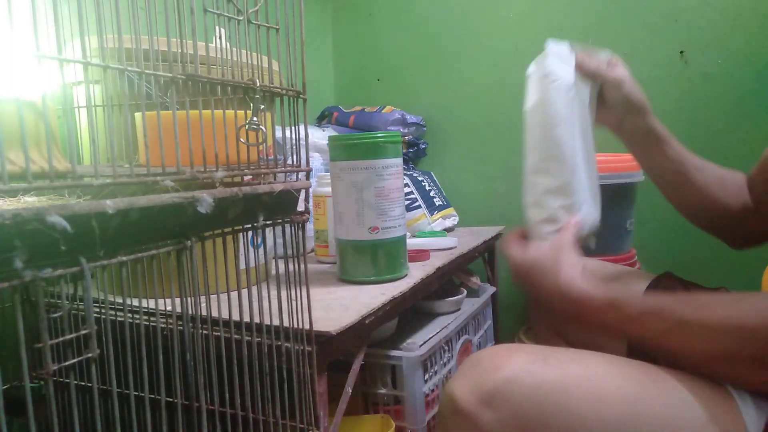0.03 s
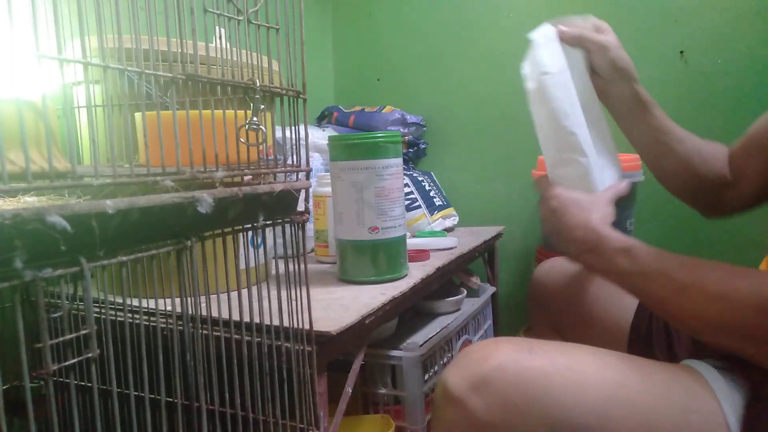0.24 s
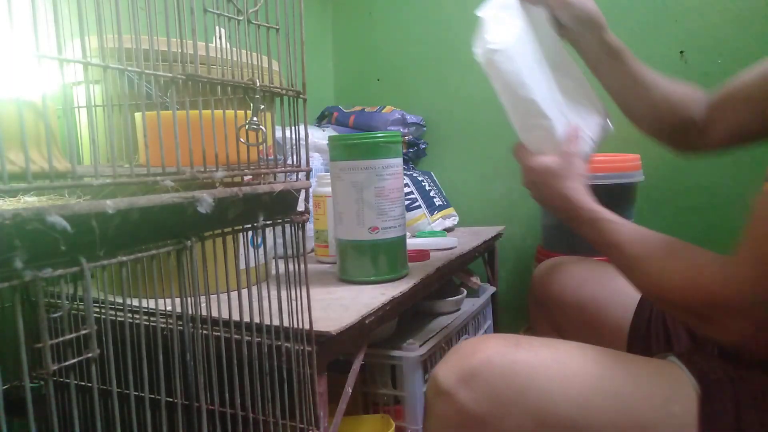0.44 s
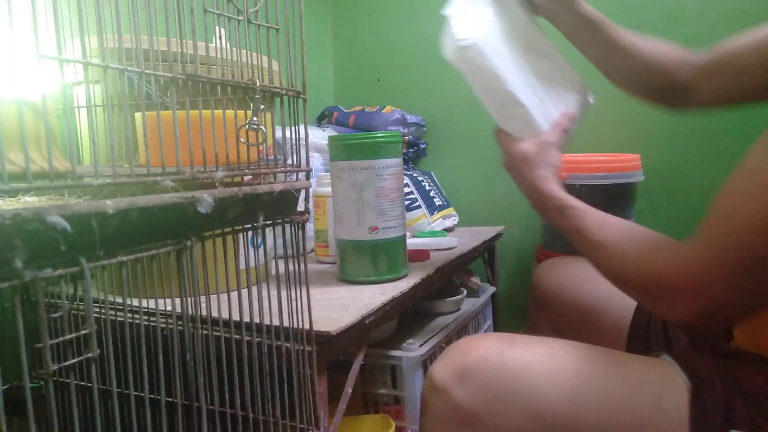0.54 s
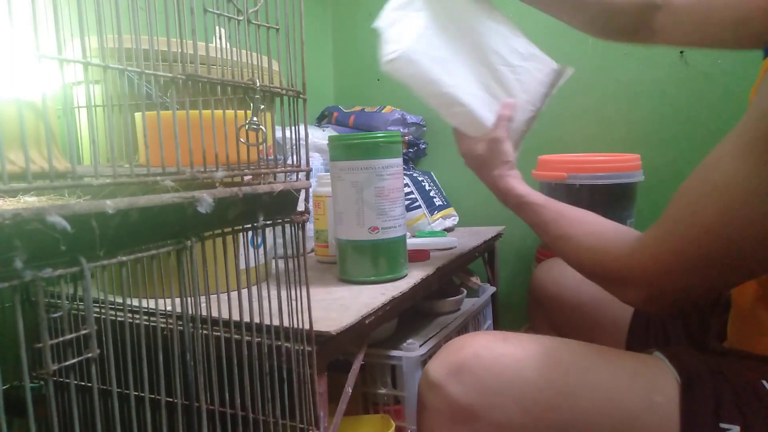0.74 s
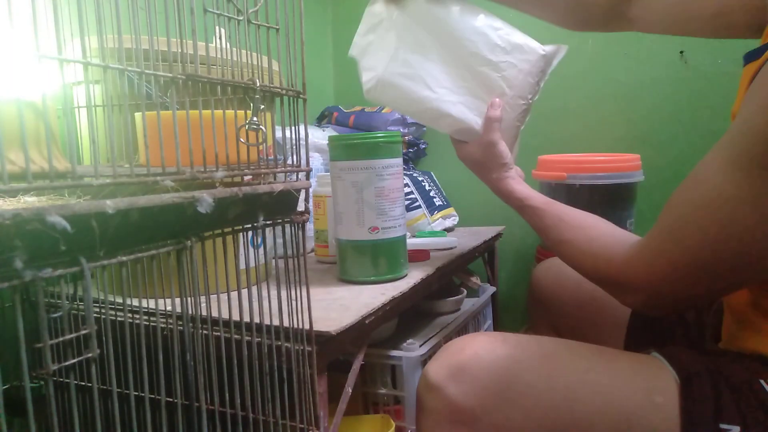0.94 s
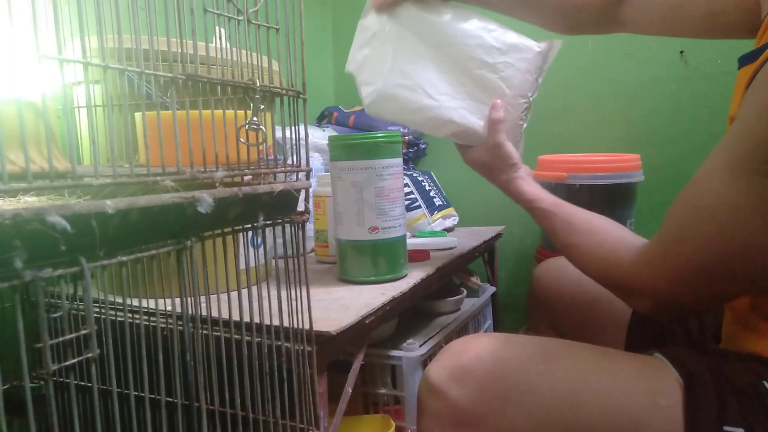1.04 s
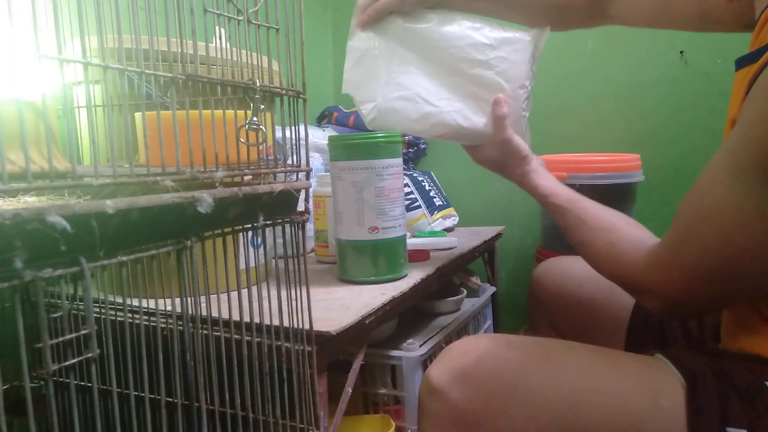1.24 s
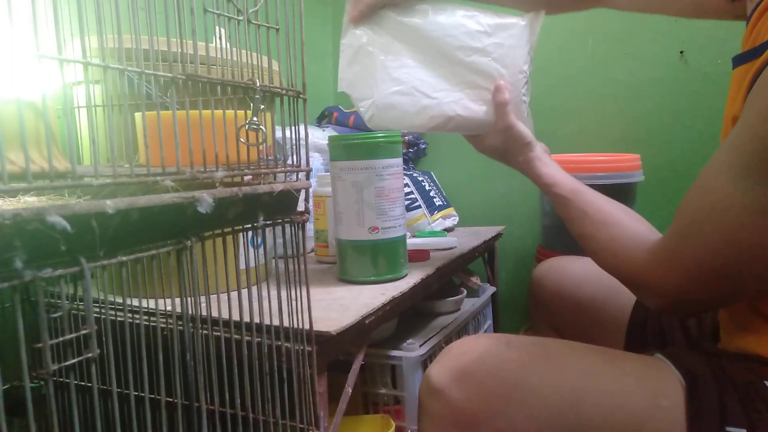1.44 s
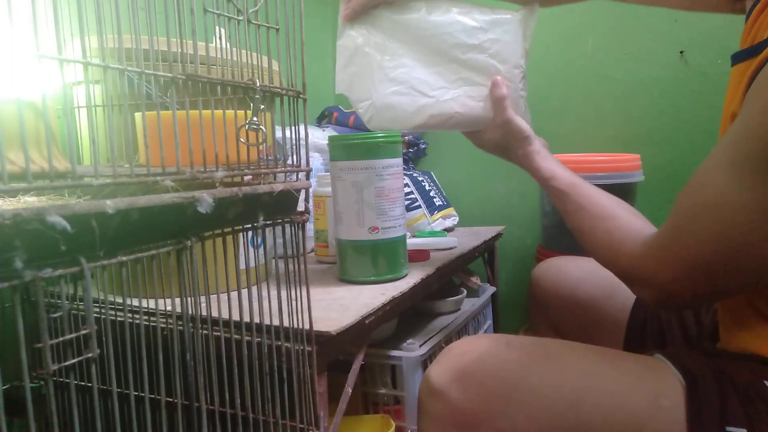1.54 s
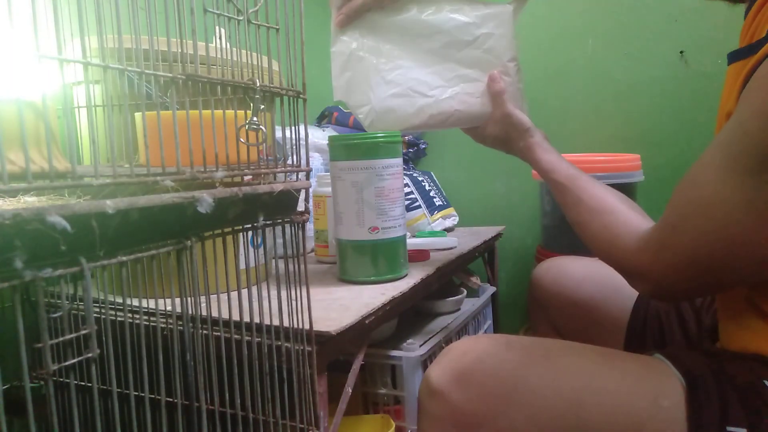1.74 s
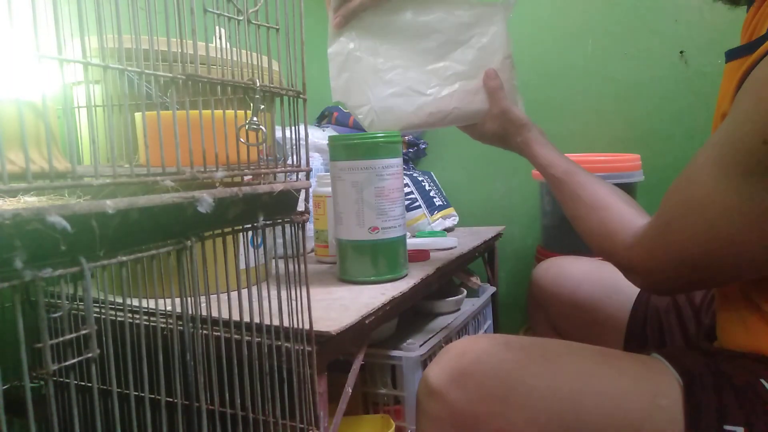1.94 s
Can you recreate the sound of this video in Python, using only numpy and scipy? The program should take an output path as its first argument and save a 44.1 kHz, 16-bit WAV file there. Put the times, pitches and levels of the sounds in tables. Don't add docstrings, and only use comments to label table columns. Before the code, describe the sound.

Plastic film rustles with little snaps over low room tone and shifting hiss, a more distant bird chirps quickly, then a close lovebird screams twice, loud and slightly overloaded, with a short bright indoor echo.

```python
import sys
import numpy as np
from scipy import signal
from scipy.fft import rfft, irfft, next_fast_len
from scipy.io import wavfile
from scipy.ndimage import uniform_filter1d, map_coordinates

SR = 44100
rng = np.random.default_rng(int(sys.argv[2]) if len(sys.argv) > 2 else 0)


def digitize_waveform(pressure):
    field = np.atleast_2d(pressure).T
    bounded = np.clip(field, -1, 1)
    quanta = np.round(bounded * 32767).astype(np.int16)
    wavfile.write(sys.argv[1], SR, quanta)


def elevation(decibels):
    levels = np.asarray(decibels, float)
    return 10 ** (levels / 20)


N = 88376
TOP_HZ = 15850


def unit(x):
    return x / np.sqrt(np.mean(x ** 2) + 1e-20)


def along(points, hz):
    f, v = np.transpose(points)
    return np.interp(np.log(hz + 1), np.log(f + 1), v)


def curve(rows):
    return np.interp(np.arange(N) / SR, *np.transpose(rows))


def wobble(rate, count=N):
    knots = rng.standard_normal(int(count * rate / SR) + 4)
    return map_coordinates(knots, [np.arange(count) * rate / SR])


def coloured(x, points):
    m = next_fast_len(N + 8192)
    gain = elevation(along(points, np.fft.rfftfreq(m, 1 / SR)))
    return unit(irfft(rfft(x, m) * gain, m)[:N])


def patchy(depth_db):
    z = signal.stft(rng.standard_normal(N + 512), nperseg=512)[2]
    field = uniform_filter1d(rng.standard_normal(z.shape), 5, 0)
    field = uniform_filter1d(field, 8, 1)
    return signal.istft(z * elevation(depth_db * unit(field)), nperseg=512)[1][:N]


def room(x):
    # (frequency [Hz], t60 [s])
    walls = [(500, 0.19), (2350, 0.34), (3500, 0.33), (6000, 0.3), (10000, 0.25), (15000, 0.28)]
    hz, t, z = signal.stft(rng.standard_normal(SR // 2), SR, nperseg=256)
    decay = elevation(-60 * t / along(walls, hz)[:, None])
    tail = signal.istft(z * decay, SR, nperseg=256)[1]
    delayed = np.pad(x, (150, 0))
    return signal.fftconvolve(delayed, tail / np.linalg.norm(tail))[:N]


def floor():
    # (frequency [Hz], level [dB])
    tone_colour = [(20, 6), (50, 4), (80, -3), (130, 2.5), (220, -9.5), (850, -10), (3400, -23.5),
                   (16000, -34)]
    # (time [s], level [dB])
    duck = [(0, 0), (.85, 2.5), (.95, -1.5), (1.1, -3), (1.2, -1.5), (1.5, -1.5), (1.7, -6.5), (2, -3)]
    # (frequency [Hz], level [dB])
    hiss_colour = [(1500, -15), (2500, -7.5), (5500, -11), (6800, 1.5), (8200, -10), (10300, -14.5),
                   (13000, -10.5), (15800, -0.5)]
    # (time [s], level [dB])
    hiss_ride = [(0, -63), (.3, -67), (.48, -63), (.55, -52.5), (.63, -56), (.7, -61), (.85, -55.5),
                 (.95, -47), (1.2, -54.5), (1.5, -50), (2, -47.5)]
    room_tone_db = -58
    tone_db = room_tone_db + curve(duck) + 0.76 * wobble(6.7)
    tone = elevation(tone_db) * coloured(patchy(2.0), tone_colour)
    hiss = elevation(curve(hiss_ride)) * coloured(patchy(1.0), hiss_colour)
    return tone + hiss


def rustle():
    # (time [s], level [dB])
    handling = [(0, -59.5), (.05, -66), (.165, -67), (.215, -54.5), (.3, -58.5), (.44, -73), (.52, -62.5),
                (.66, -57), (.8, -51), (.88, -61), (1.0, -72), (1.09, -56), (1.13, -69), (1.152, -51),
                (1.2, -64), (1.24, -51), (1.32, -62), (1.42, -66.5)]
    # (frequency [Hz], level [dB])
    film_colour = [(250, -19.5), (450, -6), (600, -6), (850, 0.5), (1050, -5.5), (1450, 1), (2000, -7),
                   (6000, -30.5)]
    clump_db, grain_db = 1.2, 4
    crinkle = rng.standard_normal(N) * elevation(4.3 * wobble(400) + clump_db * wobble(30.5))
    return elevation(curve(handling)) * coloured(crinkle + 0.89 * patchy(grain_db), film_colour)


def snaps():
    # (time [s], peak level [dB], pitch [Hz])
    folds = [(0.016, -45.5, 1600), (0.0333, -47.5, 3200), (0.037, -55, 2600), (0.1142, -42.5, 7000),
             (0.173, -69, 1500), (0.197, -42.5, 3980), (.222, -44, 850), (0.264, -41, 2200),
             (0.272, -52, 1560), (0.5124, -54, 1730), (0.6046, -33.5, 2310), (0.686, -48.5, 4800),
             (0.729, -45, 2880), (.822, -47, 3780), (1.1421, -42.5, 1130), (1.227, -49, 1470),
             (1.2436, -56, 1520), (1.29, -54, 1560)]
    # (frequency [Hz], level [dB])
    crack_colour = [(500, -42), (1500, -2), (2500, 3), (4500, -6), (7000, -0.5), (9000, -27), (15000, -10)]
    ring_t60, crack_t60, crack_db = 0.0087, 0.051, -8.5
    out = np.zeros(N + SR)
    t = np.arange(SR // 20) / SR
    noise = np.pad(coloured(rng.standard_normal(N), crack_colour), (0, SR))
    for s, db, hz in folds:
        start = round(s * SR)
        at = slice(start, start + len(t))
        ring = np.sin(2 * np.pi * hz * t) * elevation(-60 * t / ring_t60)
        crack = elevation(crack_db - 60 * t / crack_t60) * noise[at]
        out[at] += elevation(db) * (ring + crack)
    return out[:N]


def syrinx(notes, throat, overtone_db, rough):
    attack_s, release_s = 0.0028, 0.0064
    flutter_hz, flutter_depth, flutter_bend = 398.5, 0.37, 0.022
    wander, drift, jitter = 0.006, 0.013, 0.022
    shimmer_db = 1.5
    out = np.zeros(N + SR)
    t = np.arange(SR // 8) / SR
    count = len(t)
    k = np.arange(1, 7)[:, None]
    for s, length, hz0, hz1, db in notes:
        high = max(hz1 - 3000, 0) / 1000
        flutter_rate = flutter_hz * (1 + 0.193 * wobble(39.6, count))
        flutter = rough * np.sin(2 * np.pi * np.cumsum(flutter_rate) / SR)
        errors = wander * wobble(55.4, count) + drift * wobble(280, count) + jitter * wobble(900, count)
        unsteady = rough * errors + flutter_bend * flutter
        glide = hz0 + (hz1 - hz0) * np.clip(t / length, 0, 1)
        pitch = glide * (1 + unsteady)

        order_db = along(throat, k * hz1) + overtone_db(k, high, db)
        audible = k * pitch < TOP_HZ
        stack = elevation(order_db) * audible * np.sin(k * 2 * np.pi * np.cumsum(pitch) / SR)
        attack = np.clip(t / attack_s, 0, 1)
        release = np.exp(-np.clip(t - length, 0, None) / release_s)
        shape = attack * release * (1 + flutter_depth * flutter)
        level = elevation(db + shimmer_db * wobble(151, count))
        out[round(s * SR):][:count] += level * shape * unit(stack.sum(0))
    return out[:N]


CLEAR = 0.42


def far_bird():
    # (time [s], length [s], start pitch [Hz], end pitch [Hz], level [dB])
    chirps = [
        (.863, 0.025, 2605, 2618, -51.5),
        (.905, 0.038, 2630, 2574, -62),
        (.878, 0.047, 2175, 2305, -51.5),
        (.978, 0.016, 2267, 2303, -50),
        (1.024, 0.04, 4040, 3930, -46.5),
        (1.058, 0.0294, 4320, 4410, -48),
        (1.088, .015, 4530, 4500, -52),
    ]
    # (time [s], length [s], start pitch [Hz], end pitch [Hz], level [dB])
    scolds = [(.873, 0.016, 6400, 6380, -52.5), (.965, 0.028, 3960, 3500, -55.5),
              (.962, 0.013, 8070, 6340, -52), (.972, 0.014, 7900, 6280, -48),
              (.972, 0.011, 6430, 6370, -49), (.974, 0.023, 5200, 5240, -53),
              (.986, 0.0326, 5760, 5670, -44), (.99, 0.021, 6800, 6840, -47),
              (1.005, 0.013, 5340, 5370, -58), (1.035, 0.032, 7800, 7770, -56)]
    # (frequency [Hz], level [dB])
    far_throat = [(2000, 0), (4500, -3), (6700, 3.5), (8100, -6.5), (10500, -7), (11900, -24),
                  (13300, -6.5), (15500, 0)]

    def hollow(k, high, db):
        return -7 * (k % 2 == 0)

    return syrinx(chirps, far_throat, hollow, 2 * CLEAR) + syrinx(scolds, far_throat, hollow, 0.98)


def near_bird():
    # (time [s], length [s], start pitch [Hz], end pitch [Hz], level [dB])
    first_squawk = [(1.503, 0.0252, 2170, 2400, -39), (1.507, 0.0465, 2700, 2643, -29),
                    (1.56, 0.031, 2633, 3100, -25), (1.58, 0.033, 2600, 3100, -30),
                    (1.598, 0.019, 3930, 3880, -27), (1.622, 0.0175, 4020, 3955, -27),
                    (1.607, 0.014, 2484, 2510, -42), (1.619, 0.04, 3170, 3240, -32.5),
                    (1.526, 0.024, 2430, 2500, -24.5), (1.513, 0.011, 4350, 4900, -37),
                    (1.657, .012, 3400, 3300, -37)]
    # (time [s], length [s], start pitch [Hz], end pitch [Hz], level [dB])
    second_squawk = [(1.72, 0.045, 2900, 2910, -30.5), (1.744, 0.081, 3920, 3938, -34.5),
                     (1.764, 0.054, 4420, 4450, -32.5), (1.796, 0.01255, 2594, 2600, -24),
                     (1.838, 0.026, 2623, 2603, -34), (1.837, 0.042, 7080, 6200, -34),
                     (1.86, 0.0352, 4250, 3950, -35), (1.87, 0.026, 3740, 3740, -32),
                     (1.865, 0.0351, 7780, 7900, -39), (1.888, 0.017, 7400, 7360, -36.5),
                     (1.507, 0.037, 7000, 6900, -35), (1.729, .016, 2100, 2950, -35),
                     (1.8, .03, 4000, 2700, -40), (1.887, 0.0112, 2100, 2000, -47),
                     (1.865, 0.049, 13000, 11100, -46.5), (1.72, 0.022, 7800, 7750, -36),
                     (1.895, .02, 3900, 4800, -34.5), (1.92, 0.0205, 3850, 3700, -46),
                     (1.952, 0.0245, 4700, 4100, -43)]
    # (time [s], length [s], start pitch [Hz], end pitch [Hz], level [dB])
    whistles = [(1.549, .015, 2463, 2436, -20), (1.642, 0.0085, 4453, 4440, -22.5),
                (1.656, 0.012, 4422, 4400, -17.5), (1.675, 0.0081, 4416, 4416, -23.5),
                (1.686, 0.013, 4390, 4430, -31.5), (1.704, 0.013, 4410, 4490, -31),
                (1.718, 0.0467, 2405, 2470, -28.5), (1.762, 0.0418, 2503, 2587, -23.5),
                (1.806, 0.033, 2877, 2884, -28), (1.806, 0.039, 4200, 4203, -26),
                (1.524, 0.037, 2451, 2440, -36), (1.72, 0.036, 7260, 7300, -35),
                (1.765, .035, 7790, 7790, -39), (1.745, .04, 3900, 3935, -33.5)]
    # (frequency [Hz], level [dB])
    near_throat = [(2450, -10), (2850, -10.5), (4000, 3), (5300, 2.5), (7300, -4.5), (9800, -13.5),
                   (12600, -12), (15000, -9)]
    pure_db_per_khz, full_voice_db, bloom = 8, -31.5, 3

    def strain(k, high, db):
        loss_db = pure_db_per_khz * high + bloom * max(full_voice_db - db, 0)
        return -(k > 1).astype(float) * loss_db

    hoarse = syrinx([*first_squawk, *second_squawk], near_throat, strain, 0.99)
    return hoarse + syrinx(whistles, near_throat, strain, CLEAR)


def rasp():
    # (time [s], level [dB])
    effort = [
        [(1.5, -74), (1.51, -47), (1.548, -51), (1.556, -33), (1.62, -37.5), (1.66, -38), (1.706, -50),
         (1.715, -44)],
        [(1.716, -44), (1.722, -38), (1.775, -34), (1.837, -43), (1.885, -44.5), (1.95, -51.5)],
    ]
    # (frequency [Hz], level [dB])
    air_colour = [(200, -28), (2250, -25.5), (2600, -9.5), (4500, -7), (7300, -7.5), (8700, -22),
                  (16000, -25)]
    # (frequency [Hz], level [dB])
    fizz_colour = [(7000, -30), (8700, -12), (10000, 5), (12300, -14), (13800, -24), (15500, -13)]
    rasp_db, torn_db = 8, 2.5
    fizz_db, fizz_grows = -45.5, 0.93
    effort_db = curve([(1.499, -110), *effort[0], *effort[1], (1.97, -110)])
    torn = patchy(torn_db) * elevation(torn_db * wobble(300))
    body = elevation(effort_db + rasp_db) * coloured(torn, air_colour)
    fizz_level = elevation(fizz_db + fizz_grows * (effort_db - effort_db.max()))
    fizz = fizz_level * coloured(patchy(7.8) * elevation(0.83 * wobble(290)), fizz_colour)
    return body + fizz


def scene():
    bag = rustle() + snaps()
    far = far_bird()
    near = near_bird() + rasp()
    wet = elevation(-6.5) * room(bag) + elevation(-3) * room(far) + elevation(-4) * room(near)
    return (bag + far + near + wet + floor())[None]


def top_cut(x):
    return signal.sosfilt(signal.butter(12, 16850, fs=SR, output="sos"), x)


def record(dry):
    squared = dry ** 2
    bent = dry + 0.096 * (squared - uniform_filter1d(squared, size=2000))
    m = next_fast_len(N)
    in_band = np.fft.rfftfreq(m, 1 / SR) < TOP_HZ
    limited = irfft(rfft(bent, m) * in_band, m)[:, :N]
    return top_cut(limited)


dry = scene()
out = record(dry)
digitize_waveform(out)
```